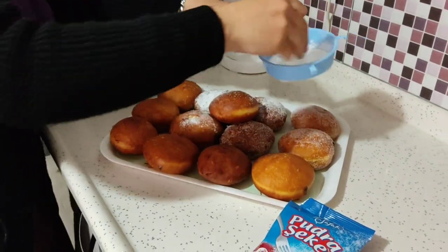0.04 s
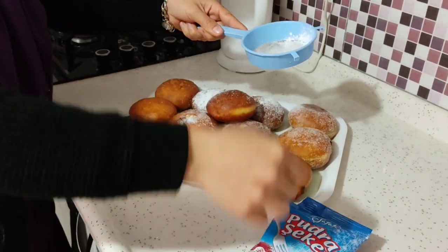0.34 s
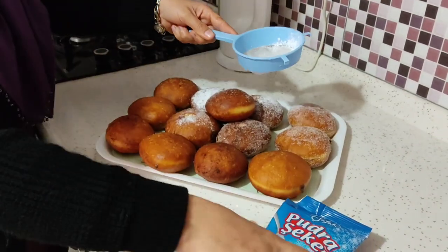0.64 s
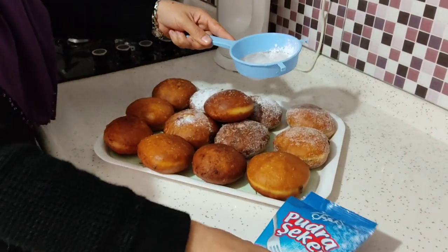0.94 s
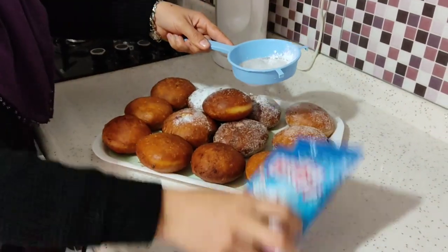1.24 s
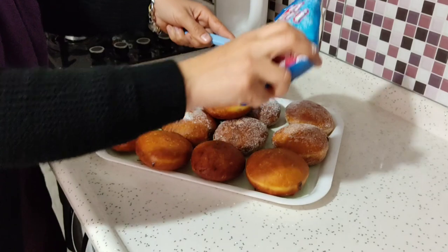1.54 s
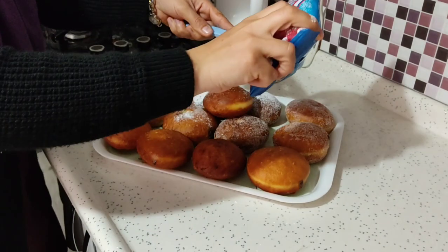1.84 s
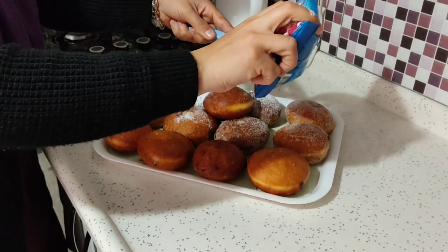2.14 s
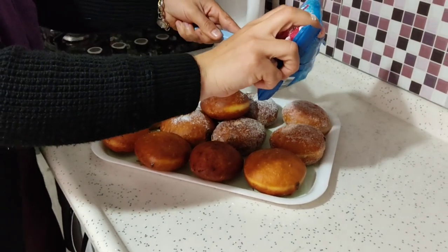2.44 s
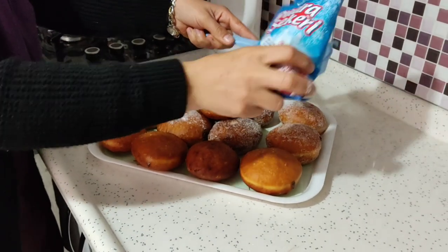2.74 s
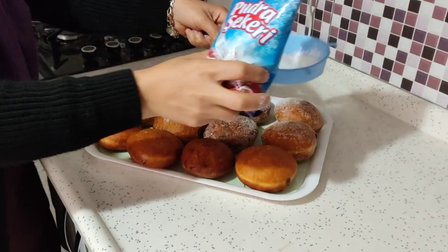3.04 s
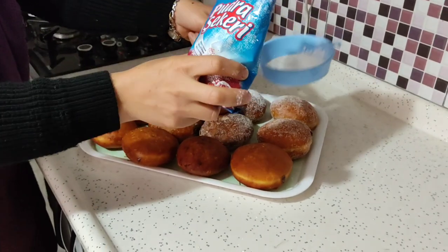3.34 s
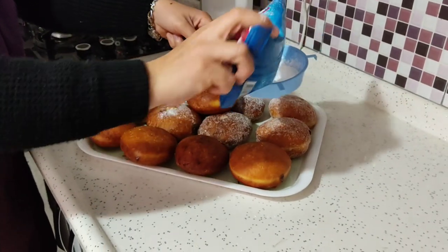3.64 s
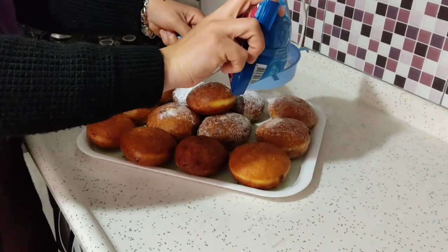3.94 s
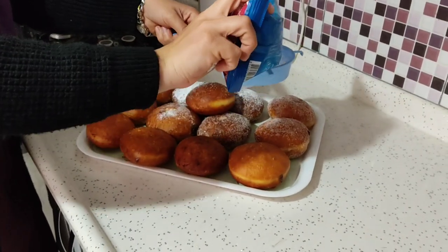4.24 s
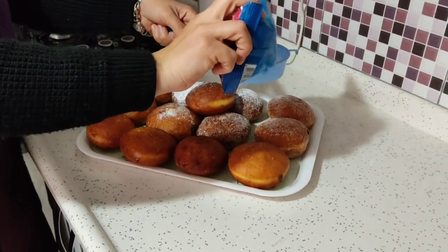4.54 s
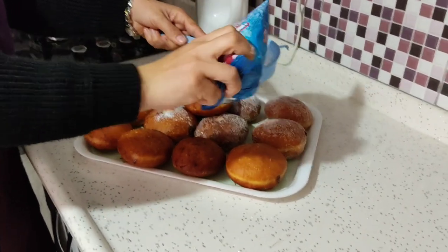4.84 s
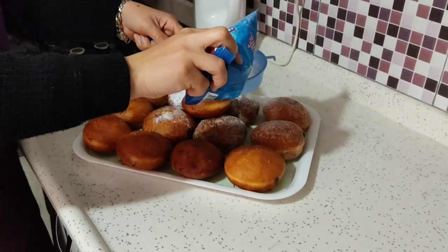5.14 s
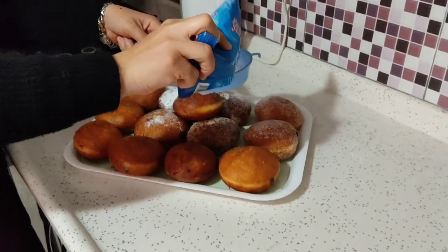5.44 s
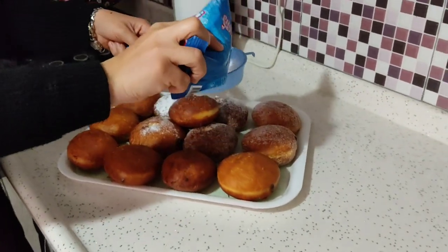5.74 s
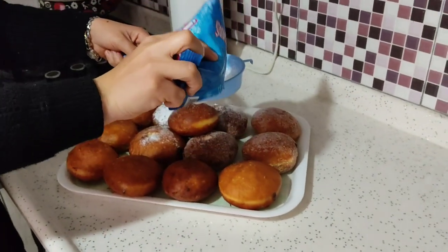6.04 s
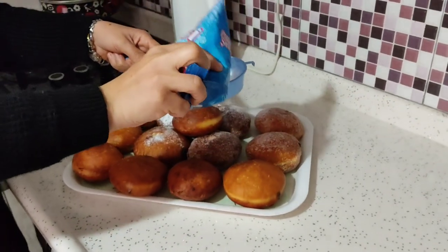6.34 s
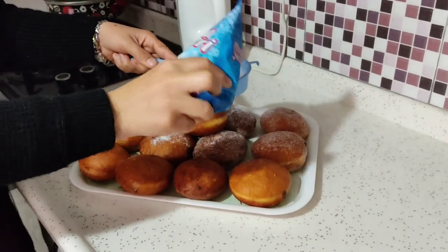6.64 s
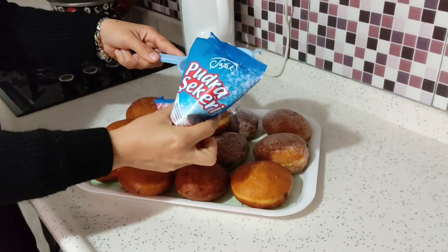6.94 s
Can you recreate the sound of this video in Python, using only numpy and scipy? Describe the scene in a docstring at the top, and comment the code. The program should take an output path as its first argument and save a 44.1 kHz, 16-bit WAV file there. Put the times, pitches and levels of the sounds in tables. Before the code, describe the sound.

In a quiet tiled kitchen, fingers rustle on a plastic packet of powdered sugar. A hand bumps the counter softly and the packet knocks lightly on a tray. After a lull with a few crinkles, the packet is squeezed, giving sharp snaps and hollow pops, then shaken in a quick, soft rhythm as the powder shifts inside. The microphone is about half a metre away, and each sound has a short tail.

```python
"""A tiled kitchen, a phone with two microphone ports about half a metre from the counter.
Over low room tone, fingers rustle on a plastic packet of powdered sugar; the hand bumps the counter
and the packet knocks a tray (0.9 s) as it is picked up. After a lull it is squeezed over a small sieve
(from 4 s): creases snap and the walls pop in and out. From 5.4 s come nine even shakes, the powder
slumping with each. The kitchen answers every sound with a short tail."""
import sys
import numpy as np
from scipy import signal
from scipy.fft import rfft, irfft
from scipy.io import wavfile
from scipy.ndimage import uniform_filter1d

SR = 44100
rng = np.random.default_rng(int(sys.argv[2]) if len(sys.argv) > 2 else 0)


def wav_record(signal):
    """Record a signal, one row per channel, as 16-bit PCM in the file named by sys.argv[1]."""
    frames = np.transpose(np.atleast_2d(signal))
    bounded = np.clip(frames, -1, 1)
    # unit amplitude maps onto the largest positive 16-bit level
    quanta = np.round(bounded * 32767).astype(np.int16)
    wavfile.write(sys.argv[1], SR, quanta)


N = 316197
HIT = 4096  # samples in one short hit
TIME = np.arange(N) / SR
HIT_HZ = np.arange(HIT // 2 + 1) * SR / HIT

# the kitchen at rest [f/Hz, level/dB]
ROOM_TONE_SPECTRUM = [(20, 1), (35, -10.5), (60, -13), (120, -20), (200, -13), (300, -19.5), (450, -21.5),
                      (900, -28.5), (2000, -36), (4000, -40.5), (8500, -49), (10500, -50.5), (15500, -69)]
# its reverberation by band [f/Hz, t60/s, level/dB]
REVERB_BANDS = [(142, 0.33, 5.5), (537, 0.42, -2.5), (1200, 0.33, -1.5), (2780, 0.26, 0), (7800, 0.22, -4)]
# reflections off counter, tiled wall and cupboard [delay/s, level/dB]
REFLECTIONS = [(.0032, -9), (.0068, -18.5), (0.0163, -15.5), (0.0207, -14.5)]
# likeness of the two ports, for direct and for diffuse sound [f/Hz, correlation]
DIRECT_COHERENCE = [(100, 0.64), (1000, 0.98), (2500, 0.15), (5000, 0.17), (12000, 0.061)]
ROOM_COHERENCE = [(30, 0.046), (150, 0.44), (400, 0.52), (1000, 0), (2000, 0.039), (12000, 0.093)]
# colour difference between the ports [f/Hz, left minus right/dB]
PORT_TILT = [(50, 1), (150, 5.5), (500, 3), (1200, 2), (2500, 0.5), (4500, 0), (6000, 0.5), (7800, 0),
             (9500, 10.5), (12000, 1.5)]

# the hand bumping the counter, and the packet's one knock on the tray [t/s, level/dB]
HAND_BUMPS = [(0.755, -55), (0.794, -59), (0.896, -53), (.928, -60)]
KNOCK = (0.94, -45.5)
# dull thump of the counter [f/Hz, level/dB]
COUNTER_SPECTRUM = [(25, 1), (70, -5.5), (160, -4), (300, -18), (1000, -48), (4000, -80)]
# modes of the tray [f/Hz, level/dB, t60/s]
TRAY_MODES = [(780, -4, 0.049), (858, -2, .08), (885, -2, 0.18), (937, -7, 0.13), (1430, -17, .1),
              (2133, -1, 0.12), (2130, -10, 0.17), (2240, 0.5, 0.14), (2310, -8, 0.11), (2918, -23, .2)]
# vigour of the shaking [t/s, level/dB]
SHAKE_VIGOUR = [(5.42, -8.5), (5.58, 1.5), (5.88, -3), (6.04, 1.5), (6.5, -6.5), (6.65, -8)]
# powder sliding as the packet is lifted, tipped and emptied [peak t/s, length/s, level/dB]
POWDER_SLIDES = [(0.86, 0.057, -62), (2.05, 0.23, -69.5), (2.4, 0.034, -52), (3.89, 0.05, -64.5),
                 (4.34, 0.089, -63), (4.54, 0.04, -56.5), (5.23, 0.15, -70), (6.03, 0.058, -61),
                 (6.36, 0.22, -58.5), (6.88, 0.13, -66.5)]
# film rubbing steadily under the fingers [t/s, level/dB]
FINGER_RUB = [(0.0, -66), (0.26, -59), (0.46, -67), (0.62, -73), (0.84, -60), (1.3, -78.5), (1.6, -75.5),
              (2.02, -66), (2.95, -81), (3.49, -77.5), (4.35, -56.5), (4.59, -61.5), (5.03, -62),
              (5.59, -67.5), (5.83, -70), (6.21, -59.5), (6.55, -63.5), (7.17, -60)]
# strokes of skin over plastic, and brief slips of film leading into a snap [peak t/s, length/s, level/dB]
STROKES_AND_SLIPS = [(0.087, 0.056, -47), (0.21, 0.03, -50.5), (0.305, 0.055, -54), (0.393, 0.027, -55.5),
                     (0.521, 0.043, -59.5), (0.675, 0.091, -59.5), (0.741, 0.022, -53.5),
                     (0.87, 0.034, -54), (1.312, 0.031, -64.5), (1.92, 0.091, -57), (2.127, 0.022, -69),
                     (2.378, 0.029, -60), (2.7, 0.1, -77.5), (3.198, 0.032, -71), (3.258, 0.019, -60),
                     (3.5, 0.04, -71), (3.575, 0.021, -68), (3.698, 0.024, -65), (3.83, 0.035, -64),
                     (4.113, 0.0034, -23), (4.421, 0.0023, -21), (4.765, 0.004, -32), (4.85, 0.099, -58),
                     (6.43, 0.048, -67)]
# the packet's walls popping softly [t/s, level/dB, f/Hz, crack re level/dB]
WALL_POPS = [(0.666, -58.5, 510, -13), (0.752, -54.5, 560, -5), (1.124, -47.5, 630, -9.5),
             (1.756, -57, 1260, -9), (2.087, -51, 850, -21), (2.376, -55, 860, -6),
             (2.412, -36.5, 756, -24), (3.868, -52, 900, -7), (4.071, -30, 940, -28),
             (4.236, -42, 885, -21), (4.451, -41.5, 1110, -22), (4.479, -32.5, 1100, -14),
             (4.544, -42, 766, -3), (4.81, -37.5, 606, -19), (5.005, -39, 1140, 4.5),
             (5.254, -48.5, 520, -25), (5.444, -46.5, 800, -16), (5.542, -46.5, 1040, -27),
             (5.606, -47, 935, -8.5), (6.061, -46, 774, -28), (6.116, -52, 1100, -19),
             (6.198, -40.5, 1090, -9.5), (6.293, -38.5, 1110, -18), (6.336, -39.5, 1040, -9),
             (6.354, -42, 1080, -20), (6.445, -34.5, 900, -10.5), (6.484, -36.5, 1100, -7.5),
             (6.498, -36.5, 960, -18)]
# creases snapping through [t/s, level/dB, crease f/Hz, crack re level/dB, wall re level/dB,
# wall f/Hz, left minus right/dB]
CREASE_SNAPS = [(0.8793, -36.5, 7400, -5, -14.5, 775, -9), (0.929, -44, 4800, -2.5, -4, 900, -16),
                (0.9398, -28, 7800, -7.5, -12.5, 900, 7), (1.2187, -49, 4610, -5, -0.5, 990, -6),
                (1.6825, -43, 7770, -19.5, -29, 796, 0.5), (1.8577, -22.5, 8200, -13, -14.5, 850, -0.5),
                (4.1132, -17, 5260, -7, -6.5, 1820, -8), (4.286, -32.5, 6240, 0.5, 6, 1110, 0),
                (4.42, -26, 8300, -6, -15.5, 804, 1), (4.513, -31.5, 7750, -0.5, -7, 1200, -3),
                (4.651, -48, 8340, -5.5, -6, 751, -2), (4.7681, -30, 8500, -4, -0.5, 920, -2),
                (4.9524, -41.5, 5040, -1, -9.5, 1870, -1), (5.017, -15, 6250, -13, -23.5, 1790, -7.5),
                (5.0309, -29.5, 6690, -1.5, -4.5, 1300, 9.5), (5.1215, -33, 7510, -6.5, -2.5, 1080, 4.5),
                (5.279, -39.5, 7400, 0, -10.5, 856, -3), (5.352, -45, 7550, -29, -20, 781, -4),
                (6.8817, -50, 7640, 5, 7.5, 1200, -1), (6.998, -35, 7600, -10, -11, 920, -4.5)]
# resonances of the filled packet [f/Hz, width/Hz, level/dB]
PACKET_MODES = [(523, 35, 1), (796, 143, 5.5), (826, 30, -13), (1126, 15, 8), (1286, 20, -19),
                (1726, 18, -15), (1840, 33, 5)]

# spectra of the packet's sounds [f/Hz, level/dB]
POWDER_SPECTRUM = [(40, -17), (100, -10), (180, 7.5), (300, 5.5), (600, 0), (1000, -2.5), (1800, -11),
                   (3500, -22), (9000, -47)]  # sugar slumping
THUD_SPECTRUM = [(50, -22), (110, -10), (180, 0.5), (270, -5.5), (480, -2.5), (1200, -29), (5000, -88)]  # sugar jolted
CRUNCH_SPECTRUM = [(200, -28), (600, 1), (1100, -1), (2000, 1), (3300, -17), (5000, -25), (10000, -45)]  # film under load
FILM_SPECTRUM = [(200, -16.5), (600, -16), (1000, -9.5), (1700, -8), (3300, -7), (5700, -5.5), (7500, 2.5),
                 (8600, 4), (9400, -4), (10200, -15), (12500, -19.5), (15500, -22)]  # film dragging and slipping
WALL_SPECTRUM = [(150, -33.5), (350, -7), (550, -1), (850, 1), (1800, 0), (2400, -6), (5000, -50),
                 (10000, -77)]  # a wall flipping over
CRACK_SPECTRUM = [(1000, -22), (2000, 1.5), (2700, 4.5), (3600, 5.5), (4400, 3.5), (6000, -6), (10000, -48)]  # upper mids of a snap
CREASE_SPECTRUM = [(2500, -31), (4000, -12.5), (4700, 0.5), (5500, 0), (7000, 1), (8500, 4.5), (9400, -3),
                   (10200, -15), (12500, -30), (15500, -42)]  # its treble
TICK_SPECTRUM = [(3000, -46), (8000, -18), (10500, 2), (12500, -10), (15500, -16)]  # its first sharp edge

SHAKE_START_S, SHAKE_PERIOD_S = 5.4225, 0.1535
SHAKE_TIMES = SHAKE_START_S + SHAKE_PERIOD_S * np.arange(9)


def undb(db):
    """Decibels to gain."""
    return 10 ** (np.asarray(db) / 20)


def unit(x):
    """Scale to rms 1."""
    return x / np.sqrt(np.mean(x ** 2))


def add(out, sound, start_s):
    """Mix a sound in at a given time."""
    i = int(start_s * SR)
    out[:, i:i + sound.shape[1]] += sound[:, :N - i]


def on_bins(points, size=HIT):
    """Spread (f/Hz, value) rows over the bins of a transform, along log frequency."""
    hz, values = np.array(points, float).T
    return np.interp(np.log(np.arange(size // 2 + 1) * SR / size + 1), np.log(hz), values)


def hump(hz, width):
    """Bell of height 1 round a pitch; width is a share of that pitch."""
    return 1 / (1 + ((HIT_HZ / hz - 1) / width) ** 2)


def colour(x, db):
    """Minimum-phase filter with the given gain on each bin."""
    size = x.shape[-1]
    cepstrum = irfft(np.log(undb(db)), size)
    cepstrum[1:size // 2] *= 2
    cepstrum[size // 2:] = 0
    return irfft(rfft(x) * np.exp(rfft(cepstrum)), size)


def ports(pair, coherence):
    """Blend two unrelated signals into partly alike left and right."""
    size = pair.shape[-1]
    alike = np.clip(on_bins(coherence, size), -.99, .99)
    mid, side = rfft(pair) * np.sqrt([1 + alike, 1 - alike])
    return irfft([mid + side, mid - side], size)


def wander(rate_hz):
    """Random drift with a spread near 1."""
    knots = rng.standard_normal(int(N / SR * rate_hz) + 2)
    return np.interp(TIME * rate_hz, np.arange(len(knots)), knots)


def swells(rows):
    """Smooth rises and falls, one for each (t/s, length/s, level/dB) row."""
    out = np.zeros(N)
    for s, length, db in rows:
        near = slice(*np.searchsorted(TIME, [s - 2 * length, s + 2 * length]))
        out[near] += undb(db) * np.exp(-2 * ((TIME[near] - s) / length) ** 2)
    return out


def grains(size, spread_db):
    """Two trains of tiny clicks of unequal sizes."""
    return rng.standard_normal((2, size)) * undb(spread_db * rng.standard_normal(size))


def burst(shape_db, decay_ms, db, rise=0.37):
    """An avalanche of slips; db is its loudest 4 ms, rise a share of the decay time."""
    age = np.arange(HIT) / SR * 1000 / decay_ms
    slips = grains(HIT, spread_db=2) * (1 - np.exp(-(age / rise) ** 2)) * np.exp(-age)
    sound = colour(ports(slips, DIRECT_COHERENCE), shape_db)
    power = uniform_filter1d(np.mean(sound ** 2, axis=0), SR // 250)
    return sound * undb(db) / np.sqrt(power.max())


def room_tone(level_db=-59.6, waver_db=0.2):
    """All round the microphone: low house rumble under a thin steady hiss."""
    air = ports(rng.standard_normal((2, N)), ROOM_COHERENCE)
    air = colour(air, on_bins(ROOM_TONE_SPECTRUM, N))
    return unit(air) * undb(level_db - waver_db * wander(3.25))


def kitchen_tail(x, build_s=0.0014, size=2 ** 15):
    """Diffuse tail off the tiles for sound sent in one direction; the treble dies soonest."""
    t = np.arange(size) / SR
    noise = rfft(unit(ports(rng.standard_normal((2, size)), ROOM_COHERENCE)))
    response = np.zeros((2, size))
    for hz, t60, db in REVERB_BANDS:
        band = on_bins([(row[0], row[0] == hz) for row in REVERB_BANDS], size)
        decay = undb(-60 * t / t60) * (1 - np.exp(-(t / build_s) ** 2))
        response += irfft(noise * band) * decay / np.sqrt(np.sum(decay ** 2)) * undb(db)
    return signal.oaconvolve(x[None], response, axes=1)[:, :N]


def near_path(x, skew_span_s=0.00044, left_lag_samples=3):
    """Direct sound and first hard reflections, each reaching the two ports slightly apart."""
    response = np.zeros((2, HIT))
    response[:, 0] = 1
    for delay, db in REFLECTIONS:
        skew = skew_span_s * rng.uniform(-.5, .5)
        response[0, int((delay + skew) * SR)] += undb(db)
        response[1, int(delay * SR)] += undb(db)
    response[0] = np.roll(response[0], left_lag_samples)  # the packet is nearer the right port
    return signal.oaconvolve(x, response, axes=1)[:, :N]


def grip(bump_ms=11):
    """The hand lands on the counter with dull bumps and pushes the packet against the tray, which rings."""
    out = np.zeros((2, N))
    for s, db in HAND_BUMPS:
        add(out, burst(on_bins(COUNTER_SPECTRUM), bump_ms, db), s)
    t = np.arange(SR // 2) / SR
    ring = sum(undb(db - 60 * t / t60) * np.sin(2 * np.pi * hz * t) for hz, db, t60 in TRAY_MODES)
    knock_s, knock_db = KNOCK
    add(out, undb(knock_db) * np.array([ring, ring]), knock_s)
    return out


def vigour_db(s):
    """How hard the packet is shaken at a given time."""
    return np.interp(s, *np.transpose(SHAKE_VIGOUR))


def shaking(attack_s=0.0043, release_s=0.021):
    """Motion of the packet: each shake swells quickly and dies away."""
    motion, age = np.zeros((1, N)), TIME[:SR // 2]
    shake = (1 - np.exp(-age / attack_s)) * np.exp(-age / release_s)
    for s in SHAKE_TIMES:
        add(motion, undb(vigour_db(s)) * shake[None], s)
    return motion[0]


def powder(slide_trim_db=-4, shake_db=-66, crunch_db=-3, flicker_db=4):
    """Sugar slumps in soft lumps with each tip and shake; the film crunches under its weight."""
    flow = undb(slide_trim_db) * swells(POWDER_SLIDES) + undb(shake_db) * shaking()
    lumps = ports(grains(N, spread_db=4), DIRECT_COHERENCE)
    wrinkles = ports(grains(N, spread_db=5), DIRECT_COHERENCE) * undb(flicker_db * wander(120))
    slump = unit(colour(lumps, on_bins(POWDER_SPECTRUM, N)))
    crunch = unit(colour(wrinkles, on_bins(CRUNCH_SPECTRUM, N)))
    return flow * (slump + undb(crunch_db) * crunch)


def pan(left_minus_right_db):
    """Left and right gains for a sound off the microphone's axis."""
    return undb(np.array([[1], [-1]]) * left_minus_right_db / 2)


def rustle(rub_trim_db=0.5, swell_trim_db=-2, shake_db=-57, flicker_db=2, grit_db=3.5):
    """Film drags over skin in uneven spurts, swelling with strokes, shakes and slips into a snap."""
    drag = undb(np.interp(TIME, *np.transpose(FINGER_RUB)) + rub_trim_db)
    drag += undb(swell_trim_db) * swells(STROKES_AND_SLIPS) + undb(shake_db) * shaking()
    grit = undb(grit_db * wander(900))  # wrinkles catch and let go about every millisecond
    slips = ports(grains(N, spread_db=1.8), DIRECT_COHERENCE) * undb(flicker_db * wander(90)) * grit
    return unit(colour(slips, on_bins(FILM_SPECTRUM, N))) * drag * pan(-2)


def crease_shape(hz, focus_db=6.5):
    """Spectrum of a crease giving way at its own pitch."""
    return on_bins(CREASE_SPECTRUM) + focus_db * hump(hz, width=0.16)


def wall_shape(hz, focus_db):
    """Spectrum of a wall flipping: its own pitch and the packet's resonances, damped by the powder."""
    rings = sum(undb(db) ** 2 * hump(centre, width / centre / 2) for centre, width, db in PACKET_MODES)
    rings_db = 10 * np.log10(rings / rings.max() + .25)
    return on_bins(WALL_SPECTRUM) + focus_db * hump(hz, width=0.14) + rings_db


def jolt(wall_db, decay_ms, thud_db=-56.5, wall_ref_db=-39.5, slope=0.22):
    """Thud of the powder behind a flipping wall; it grows more slowly than the wall's own sound."""
    return burst(on_bins(THUD_SPECTRUM), decay_ms, thud_db + slope * (wall_db - wall_ref_db))


def shake_hits(crease_db=-49, crack_db=-62, thud_db=-58, crease_ms=2.4, thud_ms=7):
    """Each shake flicks a crease and throws the powder against the film."""
    out = np.zeros((2, N))
    for s in SHAKE_TIMES:
        add(out, burst(crease_shape(hz=7700), crease_ms, crease_db + vigour_db(s)), s)
        add(out, burst(on_bins(CRACK_SPECTRUM), crease_ms, crack_db + vigour_db(s)), s)
        add(out, burst(on_bins(THUD_SPECTRUM), thud_ms, thud_db + vigour_db(s)), s)
    return out


def pops(pop_ms=4.6, trim_db=-4, lead_s=0.001):
    """A slack wall bulges without a crease: a hollow knock, duller the lower it is pitched."""
    out = np.zeros((2, N))
    for s, db, hz, crack_db in WALL_POPS:
        lowpass_db = -10 * np.log10(1 + (HIT_HZ / (2.25 * hz)) ** 4)
        knock = burst(wall_shape(hz, focus_db=10) + lowpass_db, pop_ms, db + trim_db, rise=0.63)
        crack = burst(on_bins(CRACK_SPECTRUM), pop_ms, db + crack_db + trim_db, rise=0.54)
        add(out, knock + crack, s - lead_s)
        add(out, jolt(db, decay_ms=8), s)
    return out


def snaps(snap_ms=2.25, tick_ms=1.9, wall_ms=4.23, crease_trim_db=-3, crack_trim_db=-2, wall_trim_db=-1):
    """A crease gives way with a sharp tick and a bright crack; the wall follows and jolts the powder."""
    out = np.zeros((2, N))
    for s, db, crease_hz, crack_db, wall_db, wall_hz, pan_db in CREASE_SNAPS:
        crease = burst(crease_shape(crease_hz), snap_ms, db + crease_trim_db, rise=0.27)
        tick_db = -33 - 0.44 * wall_db  # stronger the less the wall moves
        tick = burst(on_bins(TICK_SPECTRUM), tick_ms, db + tick_db)
        crack = burst(on_bins(CRACK_SPECTRUM), snap_ms, db + crack_db + crack_trim_db)
        wall = burst(wall_shape(wall_hz, focus_db=5), wall_ms, db + wall_db + wall_trim_db, rise=0.99)
        thud = jolt(db + wall_db, decay_ms=6.5)
        add(out, (crease + tick + crack) * pan(pan_db) + wall + thud, s)
    return out


def scene():
    """Crumpled film radiates differently each way, so the room gets its own share of every crinkle."""
    handling = grip() + rustle() + powder()
    towards_mic = snaps() + pops() + shake_hits() + handling
    away_from_mic = snaps() + pops() + shake_hits() + handling
    tails = sum(kitchen_tail(ray) for ray in [*towards_mic, *away_from_mic]) / 2
    return near_path(towards_mic) + tails + room_tone()


def record(dry, top_hz=15800):
    """The phone's microphone: each port adds its own colour, and the top is cut steeply."""
    tilt_db = on_bins(PORT_TILT, N) / 2
    heard = irfft(rfft(dry) * undb([tilt_db, -tilt_db]), N)
    return signal.sosfilt(signal.ellip(8, .2, 70, top_hz, fs=SR, output="sos"), heard)


dry = scene()
out = record(dry)
wav_record(out)
```